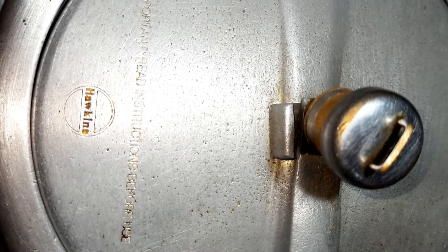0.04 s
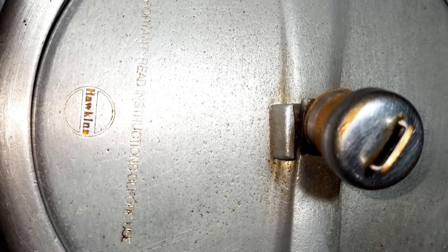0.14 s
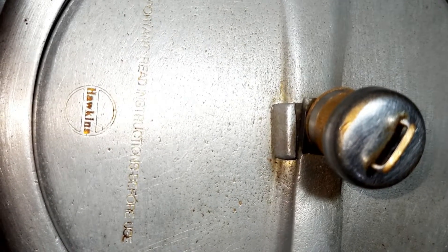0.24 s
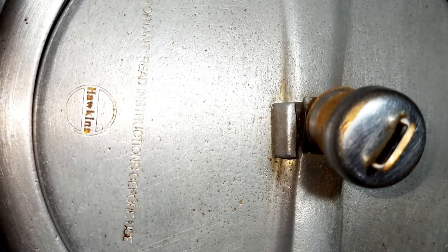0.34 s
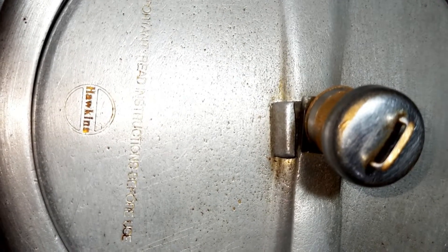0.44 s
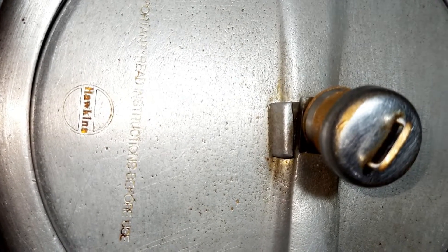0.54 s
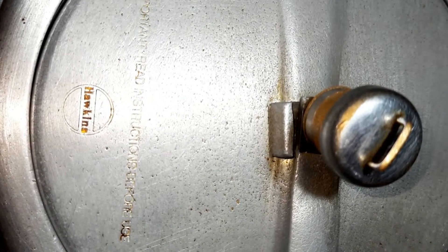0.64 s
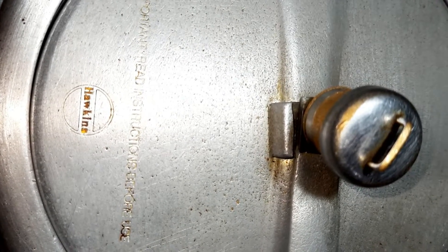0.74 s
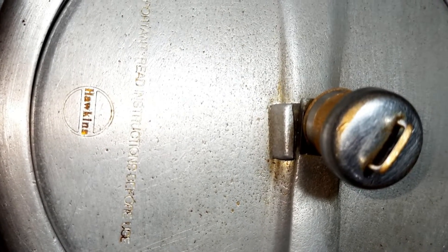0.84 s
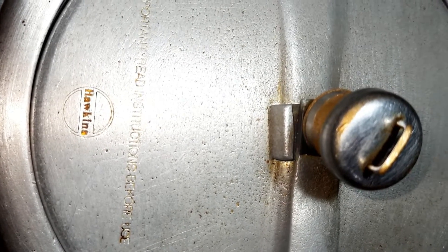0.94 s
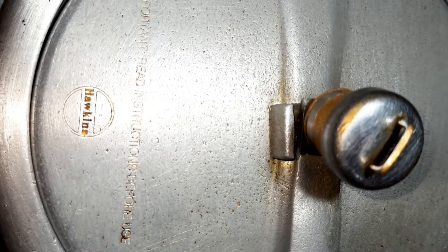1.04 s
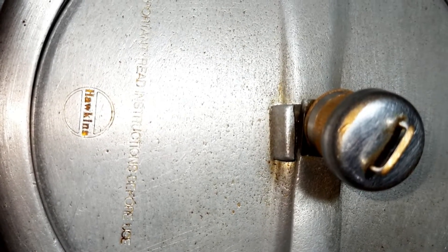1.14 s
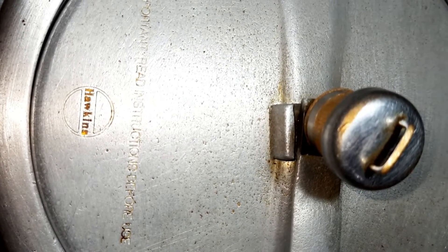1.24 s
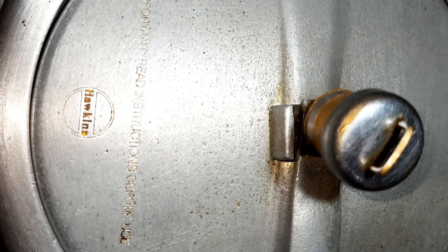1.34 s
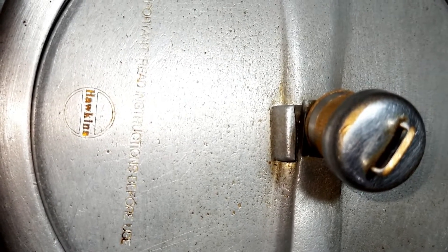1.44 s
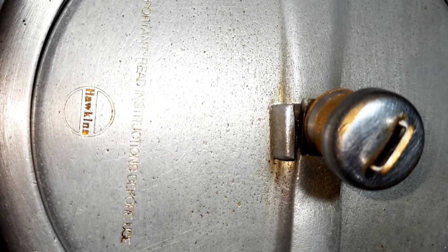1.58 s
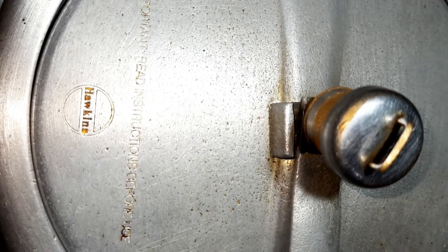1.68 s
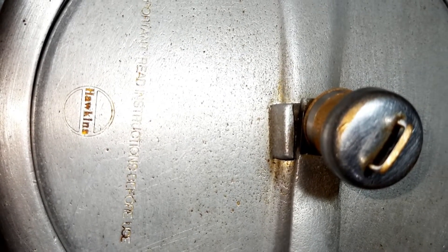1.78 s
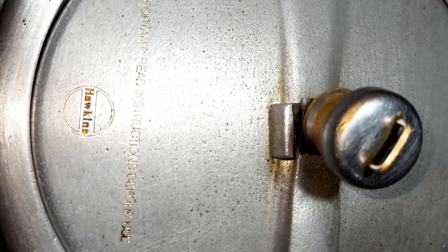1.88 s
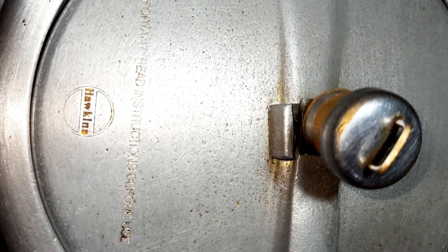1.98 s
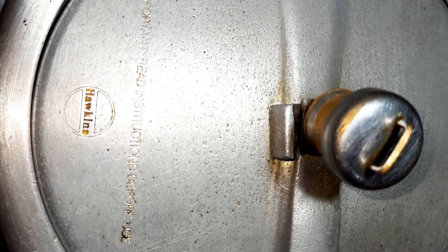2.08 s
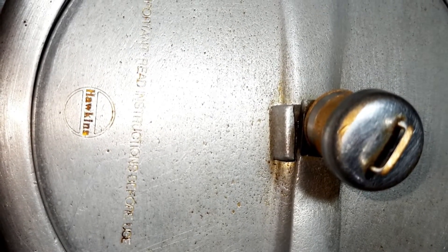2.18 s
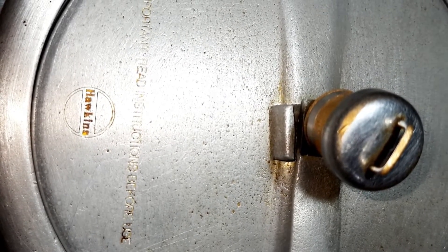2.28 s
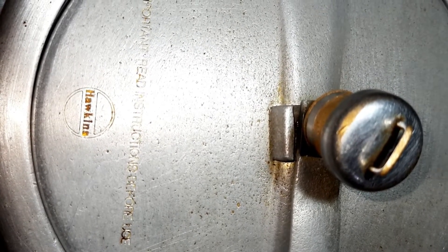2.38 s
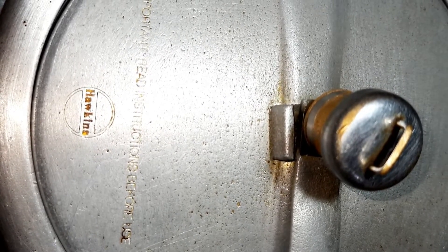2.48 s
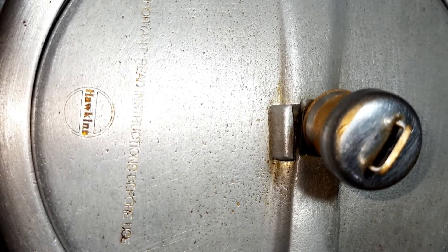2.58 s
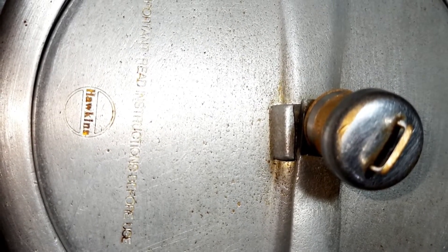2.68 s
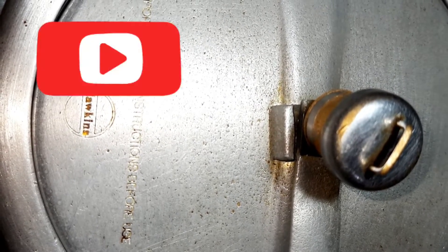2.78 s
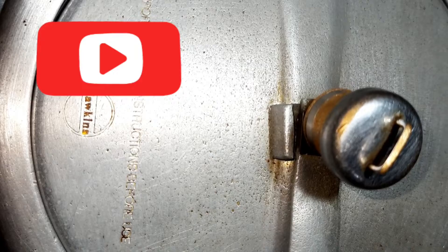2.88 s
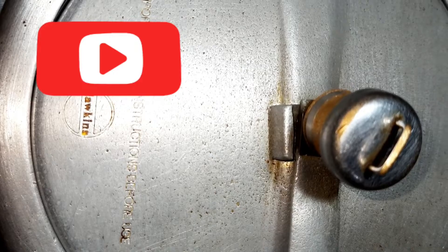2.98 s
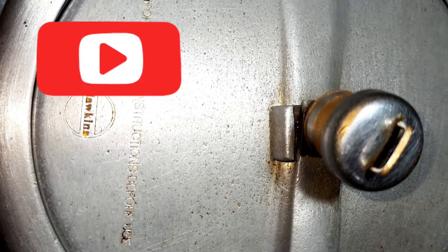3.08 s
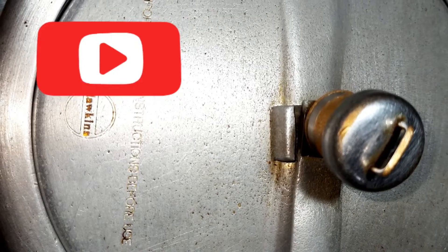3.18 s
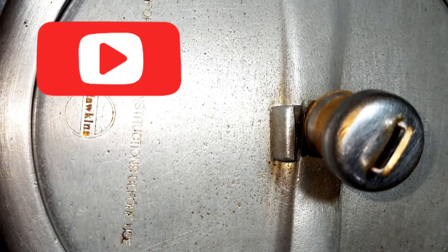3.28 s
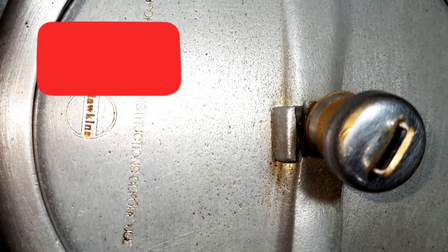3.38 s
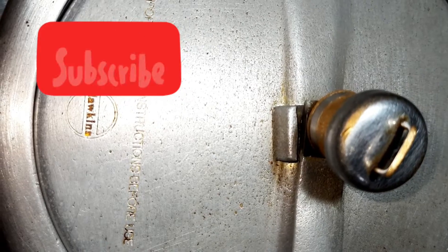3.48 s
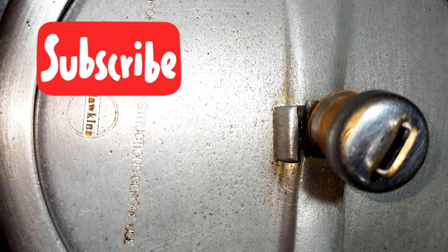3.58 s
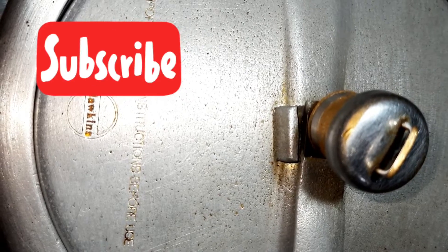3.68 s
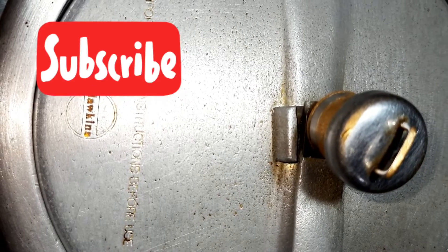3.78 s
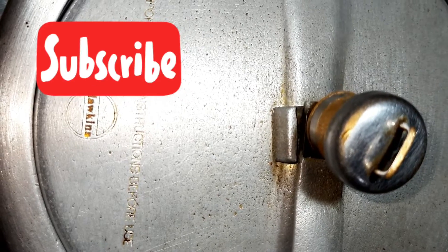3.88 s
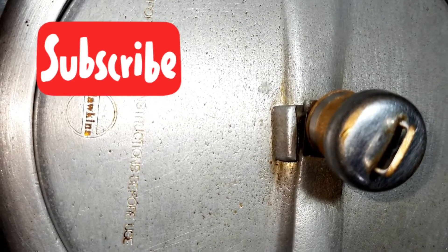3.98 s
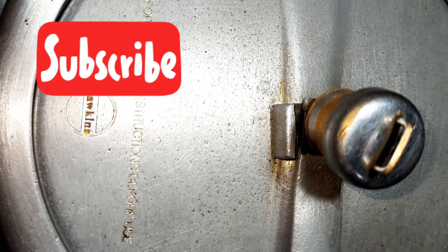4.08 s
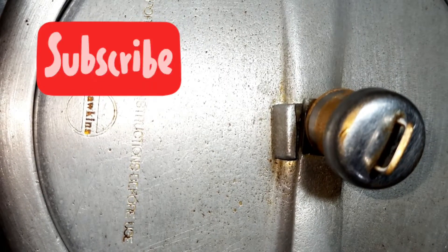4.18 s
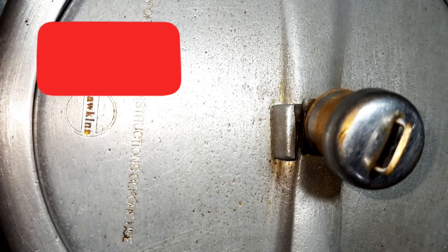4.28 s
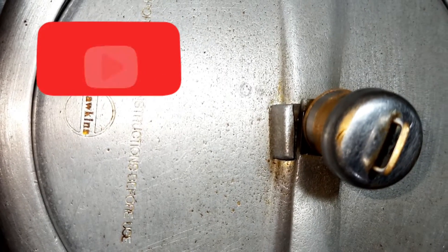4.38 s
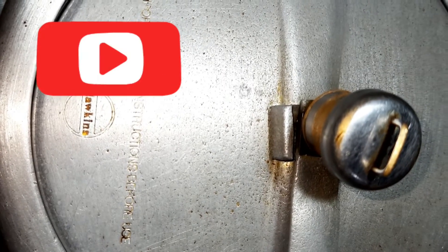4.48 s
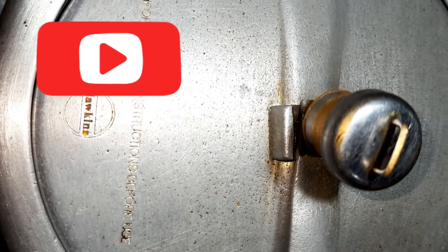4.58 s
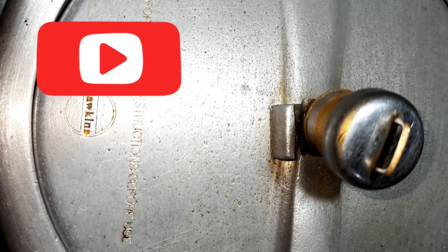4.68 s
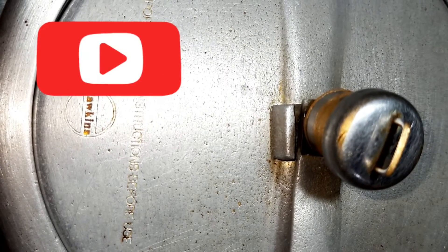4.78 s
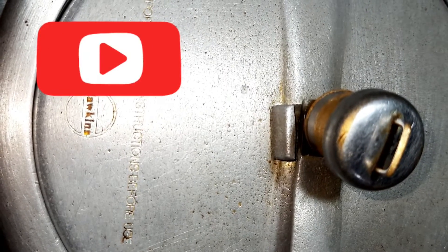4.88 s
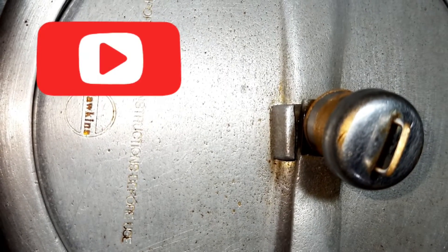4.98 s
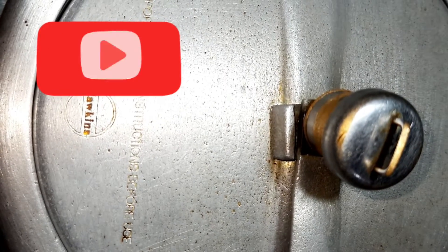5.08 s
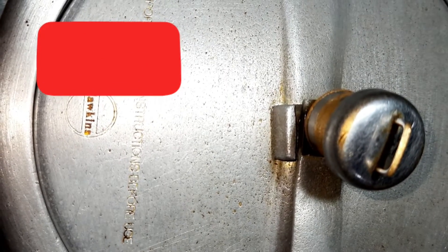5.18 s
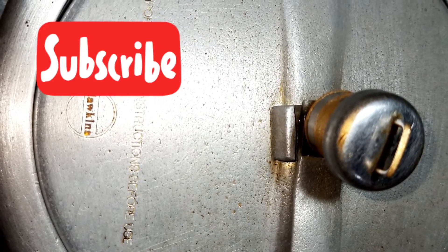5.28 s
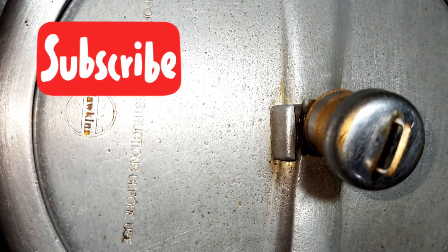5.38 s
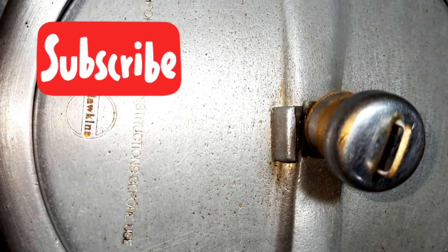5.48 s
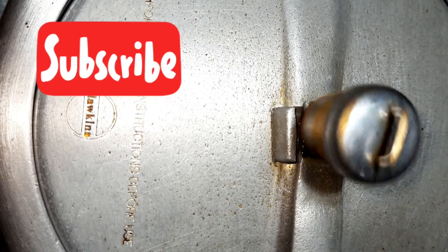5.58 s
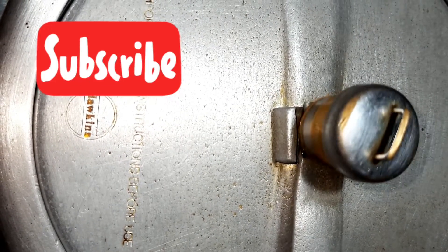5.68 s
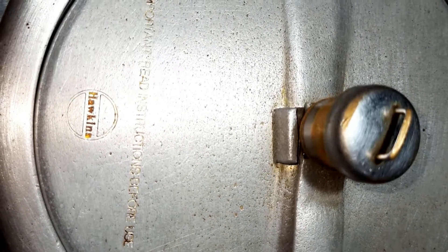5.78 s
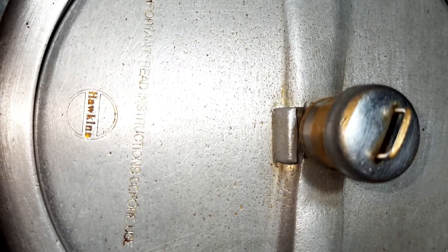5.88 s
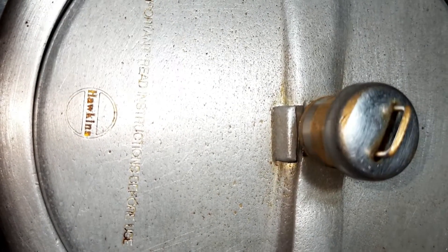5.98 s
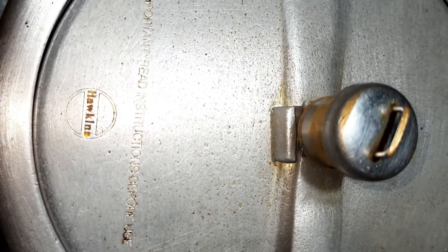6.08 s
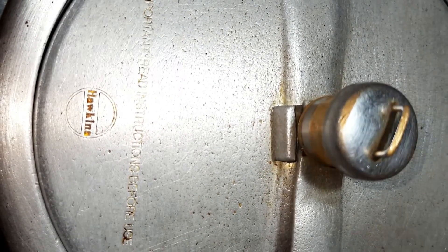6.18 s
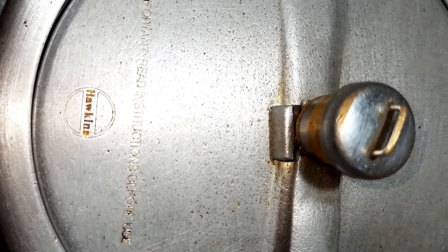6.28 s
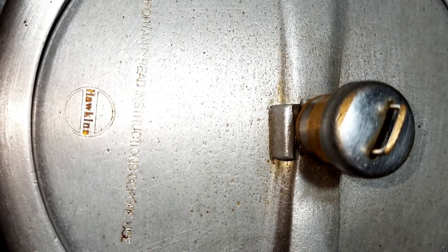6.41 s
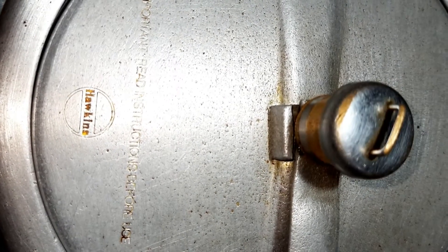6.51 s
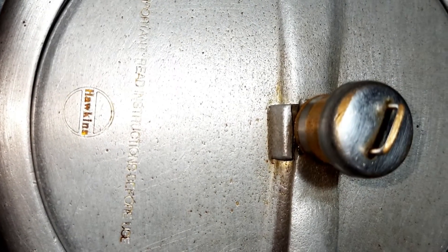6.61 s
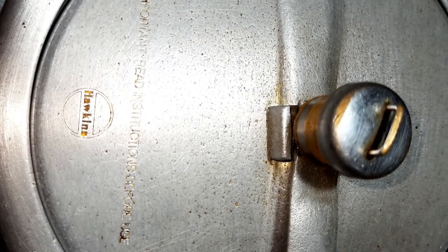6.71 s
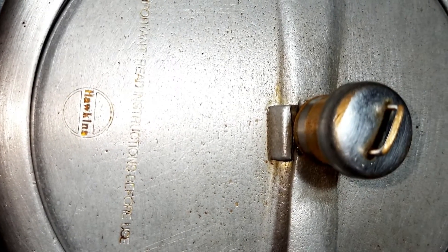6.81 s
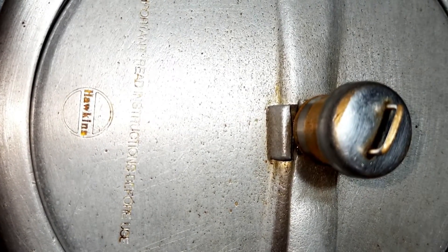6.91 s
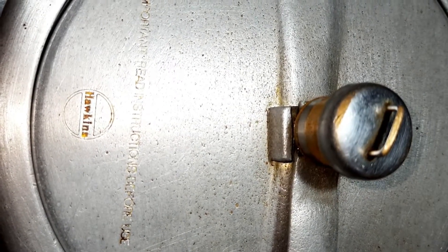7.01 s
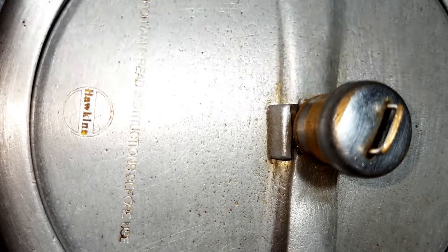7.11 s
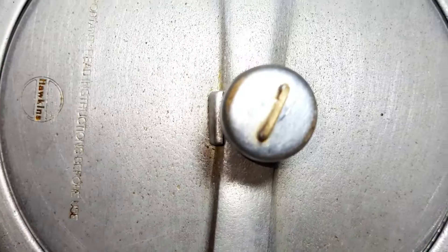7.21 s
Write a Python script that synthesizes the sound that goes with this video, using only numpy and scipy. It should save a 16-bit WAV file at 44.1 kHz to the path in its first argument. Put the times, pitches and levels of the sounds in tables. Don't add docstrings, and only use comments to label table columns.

```python
import sys
import numpy as np
from scipy import signal
from scipy.fft import rfft, irfft, dct
from scipy.io import wavfile
from scipy.ndimage import uniform_filter1d

SR = 44100
rng = np.random.default_rng(int(sys.argv[2]) if len(sys.argv) > 2 else 0)


def unload_wav(signal):
    wavfile.write(
        sys.argv[1],
        SR,
        np.round(np.clip(np.atleast_2d(signal).T, -1, 1) * 32767).astype(np.int16),
    )


def ratio_of_db(decibels):
    return 10 ** (np.asarray(decibels, float) / 20)


N = 319725
TIME = np.arange(N) / SR
HZ = np.arange(N // 2 + 1) * SR / N

# (frequency [Hz], left level [dB per Hz], right level [dB per Hz], likeness of the ports [0-1])
JET_SPECTRUM = [(914, -75, -73.5, .3), (1440, -71, -70.5, .5), (2150, -69.5, -68.5, .3),
                (2960, -69, -67, 0.5), (3848, -69.5, -68.5, 0.01), (5860, -65.5, -59.5, .5),
                (6820, -62, -59.5, 0.4), (8690, -57.5, -59.5, 0.8), (9280, -70.5, -59, 1),
                (10280, -69.5, -59.5, 0.5), (10770, -68.5, -53, 0.2), (12430, -62.5, -53, 0.88),
                (14840, -62, -53.5, .93), (16300, -59, -54.5, .85)]
LEAK_SPECTRUM = [(900, -111.4, -107.8, 0.3), (1500, -116.1, -111.9, 0.19), (2810, -118.0, -113.5, 0.13),
                 (4000, -115.7, -114.0, 0.08), (5070, -109.6, -108.4, 0.28), (6560, -104.8, -104.8, 0.33),
                 (8140, -101.2, -108, 0.61), (8500, -105.1, -90, 0.6), (9650, -118.2, -99.2, 0.23),
                 (11000, -113.4, -95.9, 0.19), (12800, -102.9, -89, 0.68), (14000, -104.8, -92.5, 0.57),
                 (15000, -101.7, -86.5, 0.05), (15600, -103.9, -101.2, 0.89)]
SECOND_HISS_SPECTRUM = [(600, -99, -92, 0.33), (1200, -88.5, -84.5, 0.48), (2500, -91, -90, 0.17),
                        (3880, -100, -90.5, .4), (4430, -80, -87, 0.85), (4900, -85.5, -80.5, 0.8),
                        (5360, -79, -81.5, 0.64), (6140, -83, -89, 0.58), (6700, -86, -84, .95),
                        (8500, -81, -71.5, 0.74), (10300, -90, -79.5, .4), (11300, -85, -71, .2),
                        (12760, -83.5, -74.5, 0.66), (15700, -89, -81, 1)]
WIND_SPECTRUM = [(25, -83.5, -94, 0.11), (44.7, -76, -72, .1), (79.2, -70.5, -65, 0.091),
                 (195, -71, -70, .1), (370, -70, -70, .1), (755, -74.5, -73.5, .1),
                 (1510, -92, -83.5, 0.12)]
FLAME_SPECTRUM = [(25, -98, -90, 0.71), (44.7, -87, -93.5, 1), (75.4, -77, -76, 0.93),
                  (114, -80.5, -80, 0.96), (214, -87, -90, 0.95), (370, -101, -94.5, 0.64),
                  (586, -104, -101, 0.78), (790, -106, -103, 0.9), (1100, -120, -118, 0.26)]

# (frequency [Hz], lead of the left port [rad])
JET_PHASE = [(0, 0), (1720, -2.6), (2410, -8.6), (2670, -6.6), (3450, -12.8), (4050, -12.5), (4390, -8.5),
             (4650, -9.9), (6290, -21.4), (6800, -21.9), (7060, -25.1), (10600, -25.2), (11500, -25.1),
             (16700, -25.2)]
LEAK_PORT_PHASE = [(400, 0), (1900, -3.1), (2700, -6.3), (3900, -6.3), (4450, -9.4), (5000, -12.6),
                   (5400, -15.7), (6000, -6 * np.pi)]

# (frequency [Hz], width [Hz], lift [dB])
LEFT_RESONANCES = [(1830, 310, 4.5), (2560, 68, -7.5), (3544, 290, 3), (4300, 150, 5.5), (6340, 177, 2),
                   (6560, 410, 3), (7545, 230, 9.5), (7510, 200, -4.5), (9250, 130, -5.5), (12700, 230, 0),
                   (14220, 200, 2.5), (15600, 300, -0.5)]
RIGHT_RESONANCES = [(2173, 110, 2.7), (2720, 44, 2.4), (3464, 720, 3.9), (4976, 220, 2.4), (6240, 540, 3.4),
                    (8200, 78, 1.1), (8280, 340, 4.3), (10885, 190, 5.1), (11790, 430, 5.3),
                    (12700, 360, 6.8), (14120, 400, 2.6)]
# (frequency [Hz], width [Hz], lift [dB])
KITCHEN_HUMP = [(850, 600, 6)]
# (frequency [Hz], width [Hz], dip [dB])
LEAK_DIPS = [(1800, 120, -7), (4780, 110, -8), (5350, 130, -10)]
SECOND_HISS_DIPS = [(4420, 200, -9), (5300, 150, -9), (6050, 150, -8)]

# (time [s], peak level [dB])
BLOWS = [
    (5.441, -32),
    (5.448, -33),
    (5.4635, -29),
    (5.476, -36),
    (5.493, -30),
    (5.523, -38),
    (5.552, -44),
]
# (frequency [Hz], level [dB], decay time t60 [s])
LID_MODES = [(420, -16, .3), (668, -14, .2), (770, -9, .12), (833, -11, .12), (872, -10, .1), (900, 5, .04),
             (1010, -8, .08), (1087, -11, .12), (1340, -13, .1)]

# (time [s], half length [s], peak level [dB])
LOW_MODE_SWELLS = [
    (5.74, .06, -76),
    (5.93, .1, -74.5),
    (6.24, 0.1, -72.5),
    (6.585, 0.046, -77),
    (6.8, .07, -72),
    (6.97, .04, -78),
]
HIGH_MODE_SWELLS = [
    (5.74, .1, -80),
    (5.92, 0.092, -81),
    (6.22, .1, -81),
    (6.66, .11, -76),
    (6.96, .06, -74),
]

# (frequency [Hz], mid or left step [dB], side or right step [dB])
ROUNDING_STEPS = [(300, -14, -14), (1200, -4, -4), (2400, 4, 3), (3100, 8.5, 5), (3600, 7, 7.5),
                  (4200, 10, 8.5), (4900, 7, 7), (5400, 5.5, 4), (6800, 4, 2), (8800, 1, 2), (9100, 6, 0),
                  (11200, 9.5, -14), (12000, 3, -14), (15500, -4, -2)]
# (from [Hz], to [Hz], share of frames [0-1])
MERGED_BANDS = [(6890, 7580, .55), (7580, 8270, .6), (8270, 8950, .8), (15150, 15750, .45)]

LANDS_S, SEALS_S, SCENE_CHANGE_S = 5.441, 5.495, 7.022
CHOKE_S, SEAL_S, CHANGE_RAMP_S, PUFF_DB = .01, 0.022, 0.0053, -12.5
# (share [0-1], decay time t60 [s])
TREBLE_TAIL, MIDDLE_TAIL, WIND_TAIL = (.03, .3), (.7, .25), (0.32, 0.75)
MIDDLE_DB, DRIFT_DB, GUST_DB = .5, 0.34, 0.5
# (resting level [dB], level at the scene change [dB], climb [dB per s])
LEAK_RISE, LEAK_MIDDLE_RISE, FLAME_RISE = (-64.5, -51.5, 29), (-87, -67, 38), (-59.5, -47, 59)
POT_HZ, POT_REST_DB = (663, 753), -90
SECOND_HISS_DB, RUMBLE_DB = -38.5, -43
KICK_DB, KICK_S = 3, .03
CLATTER_HZ, CLATTER_T60_S, CLATTER_DB = (260, 1700), .37, -4.5


def to_db(gain):
    return 20 * np.log10(gain)


def unit(x):
    return x / np.sqrt(np.mean(x ** 2))


def walk(rate):
    hold = int(SR / rate)
    steps = np.repeat(rng.standard_normal(N // hold + 1), hold)
    return np.sqrt(2) * uniform_filter1d(uniform_filter1d(steps, hold), hold)[:N]


def ramp(s, over_s):
    return np.clip((TIME - s) / over_s + .5, 0, 1)


def band(lo_hz, hi_hz):
    octave = np.log2(HZ + 1)
    above_lo = np.clip(2 * (octave - np.log2(lo_hz)) + .5, 0, 1)
    above_hi = np.clip(2 * (octave - np.log2(hi_hz)) + .5, 0, 1)
    return above_lo - above_hi


def rings(table):
    return ratio_of_db(sum(db / (1 + (2 * (HZ - hz) / width) ** 2) for hz, width, db in table))


def cavities():
    return np.array([rings(LEFT_RESONANCES), rings(RIGHT_RESONANCES)])


def ports(table, phase=((1, 0), (SR, 0))):
    hz, left_db, right_db, alike = np.transpose(table)

    def at(values):
        return np.interp(np.log(HZ + 1), np.log(hz), values)

    alike = np.clip(at(alike), 0, 1)
    shared, own = rfft(rng.standard_normal((2, N)))
    late = shared * np.exp(1j * np.interp(HZ, *np.transpose(phase)))
    left = ratio_of_db(at(left_db)) * (alike * late + np.sqrt(1 - alike ** 2) * own)
    right = ratio_of_db(at(right_db)) * shared
    return np.array([left, right]) * np.sqrt(SR / 2)


def seated_db(db):
    gate = ramp(SEALS_S, SEAL_S) * (1 - ramp(SCENE_CHANGE_S, CHANGE_RAMP_S))
    return db + to_db(gate + 1e-10)


def building_db(rest_db, last_db, climb_db):
    climbing_db = last_db - climb_db * np.abs(SCENE_CHANGE_S - TIME)
    return seated_db(to_db(np.hypot(ratio_of_db(rest_db), ratio_of_db(climbing_db))))


def swelling_db(swells):
    bells = sum(ratio_of_db(db) * np.exp(-((TIME - s) / half_s) ** 2) for s, half_s, db in swells)
    return seated_db(to_db(ratio_of_db(POT_REST_DB) + bells))


def flame():
    level_db = building_db(*FLAME_RISE)
    return unit(irfft(ports(FLAME_SPECTRUM), N)) * ratio_of_db(level_db + 0.79 * walk(30))


def flame_pop():
    s, hz, half_s = 6.047, 125, .0035
    return -ratio_of_db(-41) * np.cos(2 * np.pi * hz * (TIME - s)) * np.exp(-.5 * ((TIME - s) / half_s) ** 2)


def singing_pot():
    song = 0
    for hz, swells in zip(POT_HZ, (LOW_MODE_SWELLS, HIGH_MODE_SWELLS)):
        phase = 2 * np.pi * np.cumsum(hz + 4 * walk(11)) / SR
        song = song + np.sin(phase) * ratio_of_db(swelling_db(swells) + 5.5 + 1.7 * walk(25))
    return song * ratio_of_db([[-1.5], [1.5]])


def thin_leak():
    treble_db, middle_db = building_db(*LEAK_RISE), building_db(*LEAK_MIDDLE_RISE)
    leak = ports(LEAK_SPECTRUM, LEAK_PORT_PHASE) * band(800, SR) * rings(LEAK_DIPS) * cavities() ** .5
    treble = unit(irfft(leak * band(4860, SR), N)) * ratio_of_db(treble_db + 7.5 + 0.47 * walk(26))
    middle = unit(irfft(leak * band(1, 4700), N)) * ratio_of_db(middle_db + 4.5 + 0.87 * walk(20))
    return treble + middle


def second_scene():
    changed_db = to_db(ramp(SCENE_CHANGE_S, CHANGE_RAMP_S) + 1e-10)
    kick_db = KICK_DB * np.exp(-np.abs(TIME - SCENE_CHANGE_S) / KICK_S)
    hiss = ports(SECOND_HISS_SPECTRUM, LEAK_PORT_PHASE) * band(410, SR) * rings(SECOND_HISS_DIPS)
    hiss = unit(irfft(hiss, N)) * ratio_of_db(changed_db + SECOND_HISS_DB + 2.0 + 1.1 * walk(25))
    rumble = ports(FLAME_SPECTRUM) * rings([(72, 27, 5), (167, 60, 3.6)])
    rumble = unit(irfft(rumble, N)) * ratio_of_db(changed_db + RUMBLE_DB + kick_db + 0.75 * walk(30))
    return hiss + rumble


def kitchen():
    knocks = np.zeros(N)
    for s, peak_db in BLOWS:
        knocks[int(s * SR)] = ratio_of_db(peak_db + CLATTER_DB)
    decay = rng.standard_normal((2, N)) * np.exp(-np.log(1000) * TIME / CLATTER_T60_S)
    return irfft(rfft(knocks) * rfft(decay) * band(*CLATTER_HZ) * rings(KITCHEN_HUMP), N)


def weight():
    out, t = np.zeros((2, N)), TIME[:SR // 2]
    strikes = rng.standard_normal((len(BLOWS), len(LID_MODES), 2))
    for (s, peak_db), strike in zip(BLOWS, strikes):
        ring = 0
        for (hz, db, t60), (force, shift) in zip(LID_MODES, strike):
            tone = np.sin(2 * np.pi * hz * t + 0.52 * shift)
            ring = ring + ratio_of_db(db + 2 * force) * tone * np.exp(-np.log(1000) * t / t60)
        ring = ratio_of_db(peak_db - 5) * ring * np.minimum(t / .0012, 1)
        i = int(s * SR)
        out[:, i:i + len(t)] += np.array([ratio_of_db(-5) * np.roll(ring, 8), ring])
    return out


def buffet(hiss, wind_db, overload=0.49):
    wind = ports(WIND_SPECTRUM)
    beats = rfft(hiss ** 2 - uniform_filter1d(hiss ** 2, size=4096))
    beats = beats / np.sqrt(uniform_filter1d(np.abs(beats) ** 2, size=2000))
    shape = np.sqrt(uniform_filter1d(np.abs(wind) ** 2, size=50))
    gusts = ratio_of_db([2.8 * walk(45) + 0.89 * walk(9) for _ in range(2)])
    return irfft(wind, N) * gusts * ratio_of_db(wind_db - 1.0) + overload * irfft(beats * shape, N)


def lingering_db(flow, share, t60):
    keep, share = np.exp(-6 * np.log(10) / (t60 * SR)), np.clip(share, 0, 1)
    tail = signal.lfilter([1 - keep], [1, -keep], flow ** 2, zi=[keep])[0]
    return 10 * np.log10((1 - share) * flow ** 2 + share * tail + 1e-20)


def valve():
    flow = ratio_of_db(PUFF_DB * ramp(LANDS_S, CHOKE_S)) * (1 - ramp(SEALS_S, SEAL_S))
    drift_db = DRIFT_DB * walk(2)
    treble_db = lingering_db(flow, *TREBLE_TAIL) + drift_db
    middle_db = lingering_db(flow, *MIDDLE_TAIL) + drift_db + MIDDLE_DB
    wind_db = lingering_db(flow, *WIND_TAIL) + GUST_DB * walk(2)
    return treble_db, middle_db, wind_db


def jet():
    treble_db, middle_db, wind_db = valve()
    steam = ports(JET_SPECTRUM, JET_PHASE) * cavities() * band(765, SR)
    surge = .3 * walk(9) + .6 * walk(40)
    edges = [1, 2400, 5500, 9000, 12000, SR]
    hiss = 0
    for lo, hi in zip(edges, edges[1:]):
        flow_db = middle_db if hi < 6000 else treble_db
        hiss = hiss + irfft(steam * band(lo, hi), N) * ratio_of_db(flow_db + surge + .35 * walk(12))
    return hiss, wind_db


def scene():
    hiss, wind_db = jet()
    stove = flame() + flame_pop() + singing_pot() + thin_leak() + second_scene()
    return stove + kitchen() + weight() + buffet(hiss, wind_db) + hiss


def port_sums(lines, summed):
    rotated = np.array([lines[0] + lines[1], lines[0] - lines[1]]) / np.sqrt(2)
    return np.where(summed, rotated, lines)


def coarse_spectrum(x):
    size, offset, group = 1024, 350, 8
    starve_db, patchy_db, top_hz = 1.1, 2.4, 15750
    half, count = size // 2, N // size + 3
    window = np.sin(np.pi * (np.arange(2 * size) + .5) / (2 * size))
    padded = np.pad(x, ((0, 0), (size - offset, count * size + offset - N)))
    blocks = padded.reshape(2, -1, size)
    frames = np.concatenate([blocks[:, :-1], blocks[:, 1:]], axis=2) * window
    a, b, c, d = np.split(frames, 4, axis=2)
    folded = np.concatenate([-c[..., ::-1] - d, a - b[..., ::-1]], axis=2)
    lines = dct(folded, type=4, norm="ortho")
    line_hz = (np.arange(size) + .5) * SR / (2 * size)

    summed = (line_hz < 8950) | (line_hz > 15150)
    lines = port_sums(lines, summed)
    power = np.where(summed, np.mean(lines ** 2, axis=0), lines ** 2)
    local = np.sqrt(uniform_filter1d(power, size=40, axis=2) + 1e-18)

    frame_db = 10 * np.log10(power.mean(axis=(0, 2)) + 1e-18)
    ease_db = np.clip(0.083 * (frame_db + 18), -3.5, 0)[:, None]
    hz, *step_db = np.transpose(ROUNDING_STEPS)
    coarse_db = np.array([np.interp(line_hz, hz, db) for db in step_db])[:, None]
    supply = 2 * uniform_filter1d(rng.standard_normal(count), size=4)[:, None]
    patches = rng.standard_normal((count, size // group))
    patches = np.repeat(np.sqrt(2) * uniform_filter1d(patches, size=2, axis=0), group, axis=1)
    quantum = local * ratio_of_db(coarse_db + ease_db + starve_db * supply + patchy_db * patches)
    lines = np.sign(lines) * np.floor(np.abs(lines) / quantum + .4) * quantum * (line_hz < top_hz)
    for lo, hi, share in MERGED_BANDS:
        luck = uniform_filter1d(rng.standard_normal(lines.shape[1]), size=3)
        merged = luck < np.quantile(luck, share)
        lines[1] *= 1 - np.outer(merged, (line_hz > lo) & (line_hz < hi))

    u = dct(port_sums(lines, summed), type=4, norm="ortho")
    p, q = u[..., :half], u[..., half:]
    frames = np.concatenate([q, -q[..., ::-1], -p[..., ::-1], -p], axis=2) * window
    out = frames[:, 1:, :size] + frames[:, :-1, size:]
    out = np.pad(out.reshape(2, -1), ((0, 0), (offset, 0)))[:, :N]
    return out + x * (np.arange(N) < offset)


def top_cut(x):
    return signal.sosfilt(signal.butter(12, 17100, fs=SR, output="sos"), x)


def record(dry):
    rounded = dry / (1 + np.abs(dry / .88) ** 6) ** (1 / 6)
    mix = coarse_spectrum(rounded)
    return top_cut(mix)


dry = scene()
out = record(dry)
unload_wav(out)
```